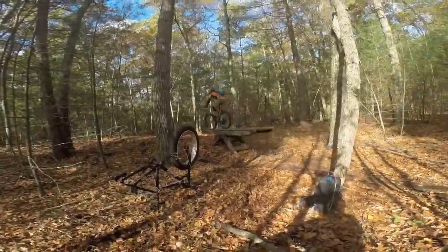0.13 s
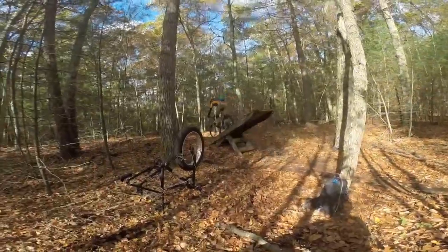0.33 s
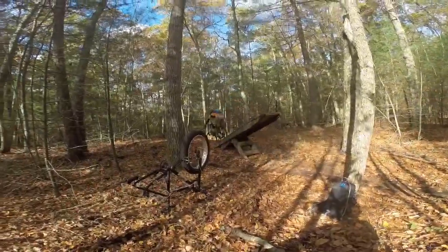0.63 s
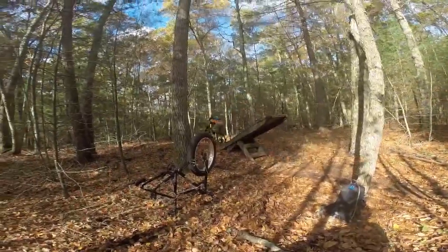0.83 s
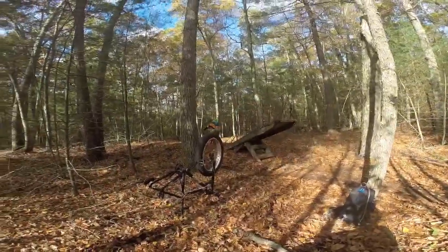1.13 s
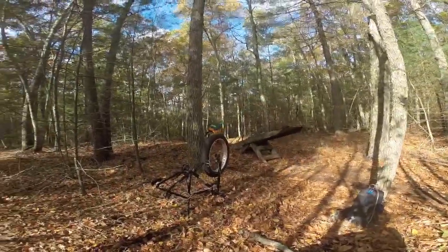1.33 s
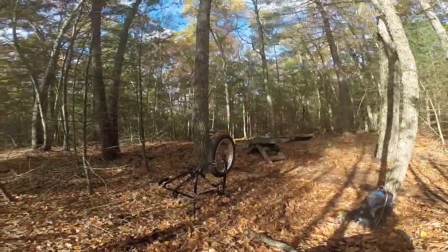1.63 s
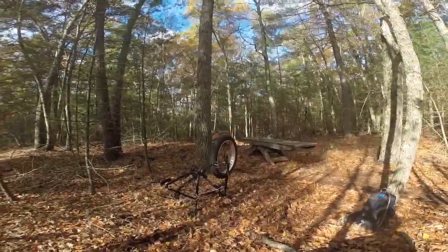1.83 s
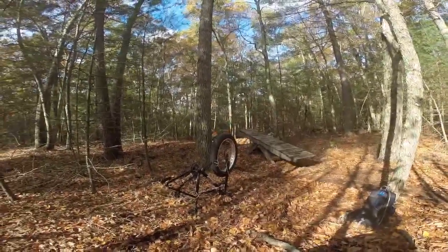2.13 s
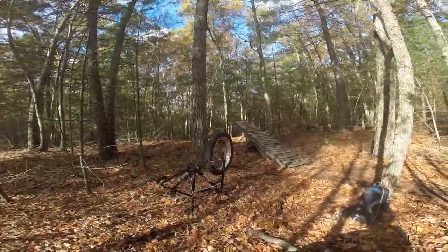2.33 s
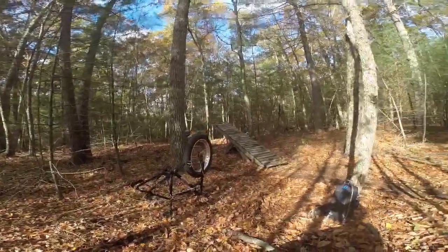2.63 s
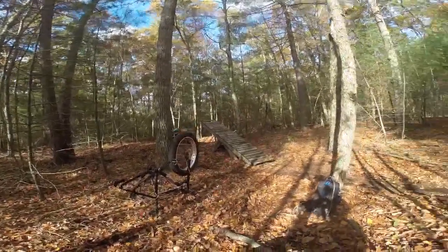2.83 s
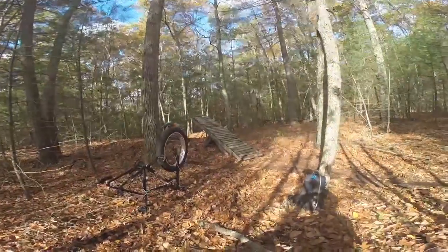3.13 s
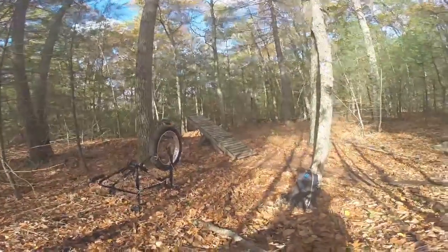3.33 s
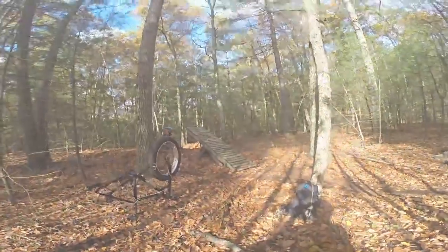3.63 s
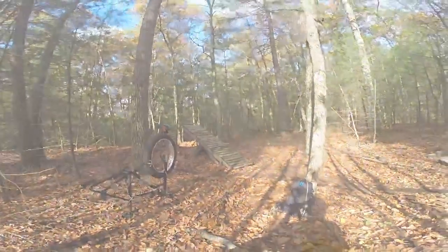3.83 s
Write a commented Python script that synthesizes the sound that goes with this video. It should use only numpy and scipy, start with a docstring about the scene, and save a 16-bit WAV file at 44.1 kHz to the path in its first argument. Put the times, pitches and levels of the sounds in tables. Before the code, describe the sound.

Bike tyres grind and clack across a wooden seesaw, with tiny high squeaks, over a faint forest hush. The plank knocks down with a brief rustle of leaves. Louder handling bumps and scrapes follow, right on the microphone.

```python
"""First comes a faint forest hush, with a low rumble of moving air and a thin electronic whine; all stay.
A bicycle rides over a wooden seesaw: tyres and chain grind, planks and bike clack, and something on the
bike, likely a brake, squeaks thinly. The board tips down into dry leaves with a faint squeal.
Soft bumps shake the camera along the way. Then it is handled: close knocks, thumps and rubs on its case."""
import sys
import numpy as np
from scipy import signal
from scipy.fft import next_fast_len
from scipy.io import wavfile
from scipy.ndimage import map_coordinates

SR = 44100
rng = np.random.default_rng(int(sys.argv[2]) if len(sys.argv) > 2 else 0)


def digitize_waveform(pressure):
    """Quantize a signal to 16-bit integers and store it at the path in sys.argv[1].

    Rows of a 2-D input are taken as channels; values are limited to [-1, 1].
    """
    field = np.atleast_2d(pressure).T
    bounded = np.clip(field, -1, 1)
    quanta = np.round(bounded * 32767).astype(np.int16)
    wavfile.write(sys.argv[1], SR, quanta)


N = 176400
TIME = np.arange(N) / SR


def amp(db):
    """Turns decibels (dB) into a number to multiply a sound by."""
    return 10 ** (np.asarray(db) / 20)


def evened(x):
    """Scales a sound to an average strength (rms) of 1."""
    return x / np.sqrt(np.mean(x ** 2) + 1e-20)


def as_hit(x):
    """Scales a hit so that its energy, spread over 20 ms, has an average strength of 1."""
    return x / np.sqrt(np.sum(x ** 2) / (.02 * SR) + 1e-20)


def value_at(points, hz):
    """Reads between (frequency, value) points, giving every octave equal room."""
    frequencies, values = np.transpose(points)
    return np.interp(np.log(hz + 1), np.log(frequencies + 1), values)


def level(points):
    """Joins (seconds, dB) points into a volume curve for the whole scene."""
    return amp(np.interp(TIME, *np.transpose(points)))


def colour(x, points):
    """Turns each frequency up or down along a curve of (Hz, dB) points."""
    size = next_fast_len(len(x) + 4096)
    hz = abs(np.fft.fftfreq(size, 1 / SR))
    log_gain = np.log(amp(value_at(points, hz)))
    response = np.exp(np.conj(signal.hilbert(log_gain)))  # rings after a hit, never before
    return np.fft.ifft(np.fft.fft(x, size) * response).real[:len(x)]


def bass_and_treble(x, bass_db, treble_db):
    """Turns the lows and highs up or down and leaves the middle alone."""
    return colour(x, [(700, bass_db), (1600, 0), (3900, 0), (6000, treble_db)])


def ring(x, modes):
    """Lets a sound ring an object's notes, each (Hz, width in Hz, dB); wider notes die sooner."""
    t = np.arange(4096) / SR
    body = sum(amp(db) * width * np.exp(-np.pi * width * t) * np.cos(2 * np.pi * hz * t)
               for hz, width, db in modes)
    return signal.fftconvolve(x, body * 2 * np.pi / SR)[:len(x)]


def wander(count, hz):
    """A smooth random drift that finds a new value hz times a second."""
    at = np.arange(count) * hz / SR
    return map_coordinates(rng.standard_normal(int(at[-1]) + 4), [at], order=3, mode="nearest")


def grit(count, grain_db):
    """Noise made of tiny slips of uneven strength; more grain_db makes it rougher."""
    return rng.standard_normal(count) * amp(grain_db * np.clip(wander(count, 1200), -2, 2))


def friction(levels, tone, grain_db):
    """Grainy rubbing that follows a volume curve and is silent outside it."""
    sounding = (TIME > levels[0][0]) & (TIME < levels[-1][0])
    return sounding * level(levels) * evened(colour(grit(N, grain_db), tone))


def play(source, rows):
    """Makes one sound for each row and mixes it in at the row's start time."""
    mix = np.zeros(N)
    for start, *settings in rows:
        sound = source(*settings)
        slot = mix[round(start * SR):][:len(sound)]
        slot += sound[:len(slot)]
    return mix


# The tone of the hush. Each row: frequency in Hz, boost or cut in dB.
HUSH_TONE = [(88, -31.5), (150, -3.5), (248, -2), (278, -3), (663, -8), (1140, -10), (1640, -11),
             (1920, -13.5), (5760, -16.5), (8000, -25), (8810, -27.5), (11100, -29.5), (15100, -35)]
def forest_hush():
    """The quiet forest: soft, almost steady noise."""
    level_db = -60 - 0.04 * wander(N, hz=7.78)
    return amp(level_db) * evened(colour(rng.standard_normal(N), HUSH_TONE))


# How the rumble rises and falls. Each row: time in seconds, level in dB.
AIR_LEVELS = [(0.0, -55), (0.33, -57.5), (0.47, -50), (0.51, -55.5), (1.54, -56), (2.16, -59),
              (2.45, -53.5), (3.62, -46), (3.71, -53.5), (3.79, -41), (3.87, -49.5), (4.0, -47)]
# The tone of the rumble. Each row: frequency in Hz, boost or cut in dB.
AIR_TONE = [(8, -11), (22, -7), (48, -1.5), (90, -9), (150, -14), (300, -35), (800, -53)]
def air_rumble():
    """Moving air makes a deep noise that swells and sinks."""
    return level(AIR_LEVELS) * evened(colour(rng.standard_normal(N), AIR_TONE))


# The tones in the whine. Each row: multiple of the base pitch, level in dB.
WHINE_TONES = [(3, -82), (4, -82), (5, -85.5)]
def electronic_whine(base_hz=2929.7):
    """Electronics give off three thin, steady, very high tones."""
    return sum(amp(db) * evened(np.sin(2 * np.pi * multiple * base_hz * TIME))
               for multiple, db in WHINE_TONES)


# How the grinding rises and falls. Each row: time in seconds, level in dB.
TYRE_LEVELS = [(.36, -64), (.425, -69), (.44, -51), (.485, -63), (.53, -64), (.575, -59), (.62, -85),
               (.86, -81), (.888, -54.5), (.93, -63), (1.0, -65), (1.13, -71.5), (1.158, -55.5),
               (1.19, -59.5), (1.31, -62.5), (1.55, -69)]
# The tone of the grinding. Each row: frequency in Hz, boost or cut in dB.
TYRE_TONE = [(200, -12), (600, 2), (1300, -7.5), (3600, 0.5), (4800, -2.5), (6400, 0.5), (7400, -16),
             (14000, -27)]
def tyre_grind():
    """Tyres and chain grind roughly as the bike crosses the planks."""
    return friction(TYRE_LEVELS, TYRE_TONE, grain_db=5)


# Soft bumps on the camera. Each row: start in seconds, level in dB, contact time in seconds,
# wobble in Hz.
CAMERA_THUMPS = [(0.432, -42, .002, 111), (0.45, -39, 0.0014, 136), (.59, -44, 0.00085, 173),
                 (1.322, -41, 0.0027, 110), (2.692, -38, 0.0003, 151), (2.722, -37, 0.0011, 117),
                 (2.9829, -32, 0.00064, 93), (3.176, -34, 0.00046, 80.6), (3.193, -37.5, 0.0024, 59.4),
                 (3.341, -35, 0.00084, 101), (3.428, -21.5, 0.00068, 157.4), (3.563, -29.5, 0.00063, 98),
                 (3.781, -28, 0.0019, 81), (3.801, -32.5, .002, 55)]
def camera_thump(db, contact_s, wobble_hz):
    """A bump pushes softly on the microphone and leaves a brief low wobble."""
    t = np.arange(SR // 8) / SR
    push = t / contact_s * np.exp(1 - t / contact_s)
    wobble = 0.31 * np.sin(2 * np.pi * wobble_hz * t) * np.exp(-t / .012)
    return -amp(db) * (push + wobble)


# The notes that board and bike ring at. Each row: pitch in Hz, width in Hz, level in dB.
BOARD_NOTES = [(533, 130, -10), (1010, 200, -19), (1250, 87, 3.5), (1800, 110, 1.5), (2037, 160, 5.5),
               (2730, 470, 4), (3520, 180, 5), (3440, 110, -3), (3704, 95, 4), (4617, 170, -0.5),
               (4900, 130, -27), (6050, 64, 0), (6200, 120, -5)]
# The tone all clacks share. Each row: frequency in Hz, boost or cut in dB.
PLANK_TONE = [(150, -11), (330, -9), (520, 9), (1100, 4.5), (2000, 2.5), (3300, 4.5), (5000, 2.5),
              (6700, 3.5), (7500, -5.5), (8700, 1.5), (10000, -12), (14500, -14)]
# Bike and board hitting. Each row: start in seconds, swell in seconds, fade in seconds, level in dB,
# bass in dB, treble in dB, pitch of the struck part in Hz, strength of its ring in dB.
PLANK_CLACKS = [(.438, 0.0042, 0.018, -45, 10, 4.5, 5500, -8), (.449, 0.009, .005, -40, 2, -5, 3550, 3),
                (0.4949, .003, 0.0072, -41.5, -4.5, 0.5, 945, 5.5),
                (0.554, .005, 0.0055, -61, 13, 14, 5500, -5),
                (0.5802, 0.0028, .004, -46, 8.5, -0.5, 530, -3.5),
                (0.592, 0.00059, 0.0045, -51.5, 8, -27, 1820, 25),
                (.891, 0.0028, .004, -42.5, -16, -2, 1890, 22.5),
                (.906, 0.0026, 0.015, -58, 14, 5, 1950, -8), (1.1593, 0.003, .005, -43, -6, -6.5, 6240, 13),
                (1.2, 0.0015, 0.0065, -56, 0, 5, 1770, 22), (1.265, 0.00076, 0.011, -54, -18, 5, 2750, 14),
                (1.285, 0.0034, 0.0088, -52, -11, 2, 5940, 5),
                (2.449, 0.0007, 0.0028, -59.5, 16, -19, 1500, 7),
                (2.4799, 0.0028, 0.0063, -36.5, -3, -0.5, 1100, 8),
                (2.665, 0.00078, 0.0067, -57, 1, 0, 3700, 5), (2.70, 0.0027, 0.0053, -56, 16, -4, 2900, -3)]
def plank_clack(swell_s, fade_s, db, bass_db, treble_db, part_hz, part_db):
    """A quick cluster of contacts cracks, and rings the board and the struck part."""
    t = np.arange(SR // 8) / SR
    swell = np.minimum(t / swell_s, 1)
    fade = np.exp(-np.maximum(t - swell_s, 0) / fade_s)
    contacts = grit(len(t), grain_db=3) * swell * fade
    ringing = ring(contacts, BOARD_NOTES + [(part_hz, 195, part_db)])
    crack = amp(-27.5) * contacts
    clack = colour(ringing + crack, PLANK_TONE)
    return amp(db) * as_hit(bass_and_treble(clack, bass_db, treble_db))


# How long the forest echoes. Each row: frequency in Hz, seconds it takes to fade by 60 dB.
ECHO_TIMES = [(200, 0.91), (1800, 0.76), (5000, .8), (10000, 0.78), (13500, 0.84)]
def forest_echo(x):
    """Tree trunks scatter a sound into a thin tail; each frequency dies at its own pace."""
    hz, t, bands = signal.stft(grit(SR, grain_db=2), SR, nperseg=256)
    fade = amp(-60 * t / value_at(ECHO_TIMES, hz)[:, None])
    build_up = np.minimum(t / 0.011, 1)
    _, tail = signal.istft(bands * fade * build_up, SR, nperseg=256)
    return signal.fftconvolve(x, tail / np.linalg.norm(tail))[:N]


# Thin squeaks from the bike. Each row: start in seconds, length in seconds, pitch in Hz, level in dB.
BRAKE_SQUEAKS = [(0.703, 0.025, 10920, -54.5), (0.737, 0.021, 10950, -69), (1.226, .014, 12560, -71),
                 (1.24, .03, 13200, -71), (1.262, 0.042, 13250, -57)]
def brake_squeak(length_s, hz, db):
    """Something on the bike, likely a brake, sings a very high, unsteady tone that swells and stops."""
    count = int(length_s * SR)
    pitch = hz * (1 + .008 * wander(count, hz=900))
    tone = np.sin(2 * np.pi * np.cumsum(pitch) / SR)
    return amp(db) * evened(tone * signal.windows.tukey(count, .7))


# How the squeal rises and falls. Each row: time in seconds, level in dB.
SQUEAL_LEVELS = [(2.20, -78), (2.27, -66), (2.38, -68), (2.46, -69), (2.56, -64), (2.68, -71), (2.75, -77)]
def board_squeal(hz=1706, width_hz=120):
    """Wood rubs as the board tips, making a very faint, fuzzy note."""
    narrow_peak = [(hz - 3 * width_hz, -40), (hz - width_hz / 2, -3), (hz, 0),
                   (hz + width_hz / 2, -3), (hz + 3 * width_hz, -40)]
    return friction(SQUEAL_LEVELS, narrow_peak, grain_db=-2)


# How the rustle rises and falls. Each row: time in seconds, level in dB.
RUSTLE_LEVELS = [(2.40, -81), (2.49, -56), (2.525, -53), (2.56, -52), (2.60, -50), (2.63, -66),
                 (2.72, -64.5), (2.85, -82)]
# The tone of the leaves. Each row: frequency in Hz, boost or cut in dB.
RUSTLE_TONE = [(150, -27), (400, -9), (620, 2), (850, -5.5), (1900, 0.5), (2400, -4.5), (3600, -2),
               (4500, -10), (6200, -8), (7200, -21), (9000, -16.5), (14000, -34)]
def leaf_rustle():
    """Dry leaves rub together as the board and wheels stir them."""
    return friction(RUSTLE_LEVELS, RUSTLE_TONE, grain_db=3.5)


# The notes that the camera case rings at. Each row: pitch in Hz, width in Hz, level in dB.
CASE_NOTES = [(654, 220, -5), (1380, 170, -15), (1700, 150, -2), (3780, 890, -11.5), (4630, 480, -10.5),
              (5600, 310, -8), (8900, 740, -25)]
# The tone all knocks share. Each row: frequency in Hz, boost or cut in dB.
CASE_TONE = [(170, 7.5), (380, 0.5), (1000, 0), (3000, 3.5), (4100, -1.5), (5200, -5), (7000, -6.5),
             (10000, -9), (11500, -13), (14500, -18)]
# Knocks on the case. Each row: start in seconds, level in dB, main pitch in Hz, second pitch in Hz,
# bass in dB, treble in dB, chatter in dB compared with the hit, chatter fade in seconds.
CASE_KNOCKS = [(2.9832, -50, 2130, 634, 8.5, 7, 0, .012), (3.1245, -55, 3580, 2880, 2, 15, -10, 0.0052),
               (3.177, -57.5, 2640, 600, 6, -7, 3.5, 0.0092), (3.219, -31, 2470, 3940, -0.5, -4, -2, 0.016),
               (3.4282, -34, 2535, 1700, 7.5, 4.5, -3.5, 0.01), (3.5635, -54, 2580, 550, 4, 0, -1, 0.011),
               (3.7811, -40.5, 3150, 1490, 2, -4.5, -6, 0.0028),
               (3.7916, -31.5, 2840, 1400, -2, -6.5, -6.5, 0.0042)]
def case_knock(db, main_hz, second_hz, bass_db, treble_db, chatter_db, chatter_fade_s):
    """A sharp tap rings the case and bounces one vibration later; then the surfaces chatter."""
    t = np.arange(SR // 8) / SR
    notes = CASE_NOTES + [(main_hz, 500, 0), (second_hz, 200, 0)]

    def through_case(force):
        """The sound the case makes when this force shakes it."""
        ringing = colour(ring(force, notes), CASE_TONE)
        return as_hit(bass_and_treble(ringing, bass_db, treble_db))

    tap = np.zeros(len(t))
    tap[0] = 1
    tap[round(SR / main_hz)] = 0.44  # the weaker bounce
    rise = np.minimum(t / 0.00063, 1)
    chatter = grit(len(t), grain_db=0.5) * rise * np.exp(-t / chatter_fade_s)
    return amp(db) * (through_case(tap) + amp(chatter_db) * through_case(chatter))


# The tone all scrapes share. Each row: frequency in Hz, boost or cut in dB.
SLIDE_TONE = [(150, -4), (400, -10.5), (620, 1.5), (780, -4.5), (980, 2), (1400, -1), (1800, 2),
              (2120, -4.5), (2800, 4), (3450, -3.5), (3950, -2.5), (5000, -12), (6450, -11), (8200, -20),
              (9500, -15.5), (14500, -33)]
# Bright scrapes on the case. Each row: start in seconds, length in seconds, starting level in dB,
# level change by the end in dB, treble in dB, pitch of the rasp in Hz.
CASE_SCRAPES = [(3.082, 0.035, -59.5, 4.5, 6, 6340), (3.189, 0.028, -46.5, -6, 1, 1710),
                (3.22, 0.03, -36, -6.5, 0, 3850), (3.49, 0.052, -55.5, -12, 5.5, 2850),
                (3.637, 0.049, -55, -5.5, 6, 5830), (3.795, 0.041, -38, -10.5, 3.5, 6500),
                (3.831, 0.059, -44.5, -1, 2, 2900), (3.887, 0.041, -45, 2, 4, 2950),
                (3.924, 0.029, -44.5, -10, 4, 3000), (3.954, .06, -59.5, -4, -7, 2770)]
def case_scrape(length_s, db, change_db, treble_db, rasp_hz):
    """A short, gritty slide over the case makes it rasp at one pitch."""
    t = np.arange(0, length_s, 1 / SR)
    soft_edges = np.clip(np.minimum(t, length_s - t) / 0.002, 0, 1)
    slide = colour(grit(len(t), grain_db=0.5), SLIDE_TONE)
    slide = bass_and_treble(slide, 0, treble_db)
    rasp = ring(slide, [(rasp_hz, 480, -3.5)])
    return amp(db + change_db * t / length_s) * soft_edges * evened(slide + rasp)


# How the dull rub rises and falls. Each row: time in seconds, level in dB.
RUB_LEVELS = [(3.25, -63), (3.265, -47), (3.288, -37.5), (3.315, -43), (3.342, -49.5), (3.37, -41.5),
              (3.42, -48), (3.445, -42), (3.475, -57.5), (3.495, -67)]
# The tone of the rub. Each row: frequency in Hz, boost or cut in dB.
RUB_TONE = [(120, -4), (350, -10), (650, -2.5), (1000, -5.5), (1600, -0.5), (2150, -15), (2900, -6.5),
            (3600, -18.5), (5000, -32), (9000, -38), (15000, -55)]
def case_rub():
    """A longer rub across the case makes a dull, finely grained noise."""
    return friction(RUB_LEVELS, RUB_TONE, grain_db=1.5)


def scene():
    """Mixes the ride, its echo among the trees, the camera noises and the background into one channel."""
    clacks = play(plank_clack, PLANK_CLACKS)
    squeaks = play(brake_squeak, BRAKE_SQUEAKS)
    ride = clacks + squeaks + board_squeal() + leaf_rustle() + tyre_grind()
    echo = forest_echo(amp(-11.5) * clacks + amp(-12.5) * squeaks)
    bumps = play(camera_thump, CAMERA_THUMPS) + play(case_knock, CASE_KNOCKS)
    rubs = play(case_scrape, CASE_SCRAPES) + case_rub()
    background = forest_hush() + air_rumble() + electronic_whine()
    return (ride + echo + bumps + rubs + background)[None]


def record(dry):
    """Cuts away the very highest treble, above 15200 Hz."""
    low_pass = signal.firwin(511, 15200, window=("kaiser", 9), fs=SR)
    return signal.oaconvolve(dry, low_pass[None], "same")


dry = scene()
out = record(dry)
digitize_waveform(out)
```